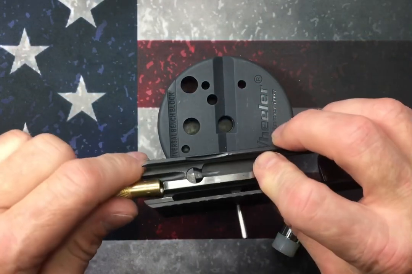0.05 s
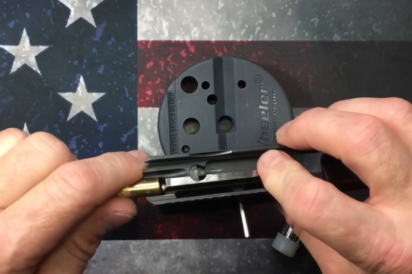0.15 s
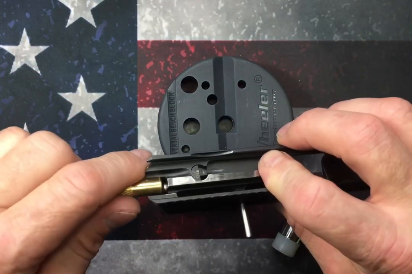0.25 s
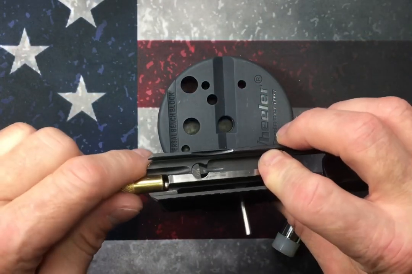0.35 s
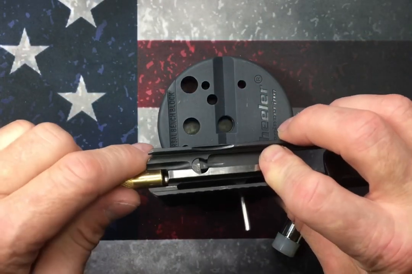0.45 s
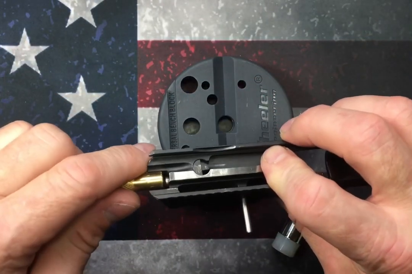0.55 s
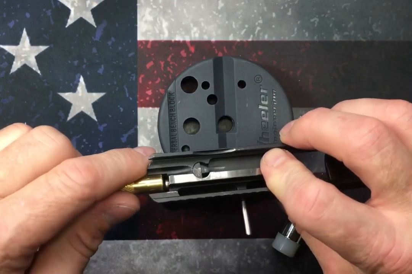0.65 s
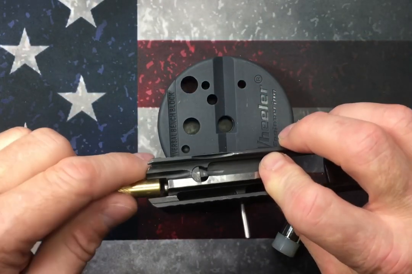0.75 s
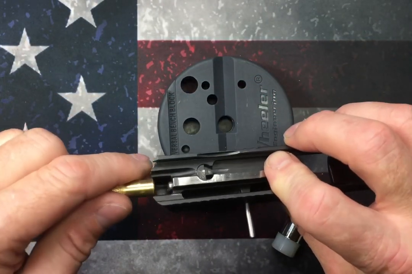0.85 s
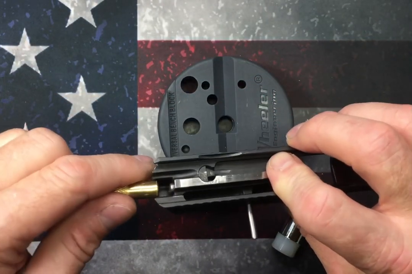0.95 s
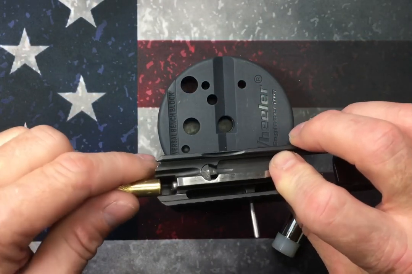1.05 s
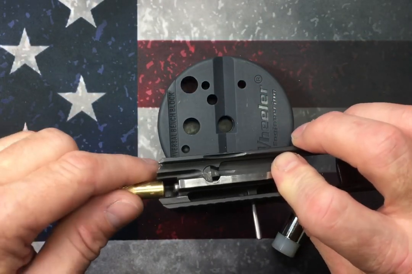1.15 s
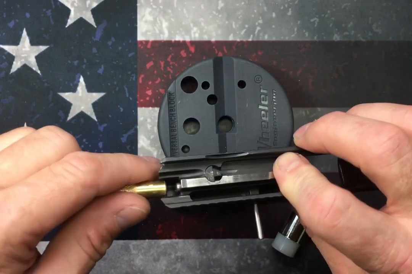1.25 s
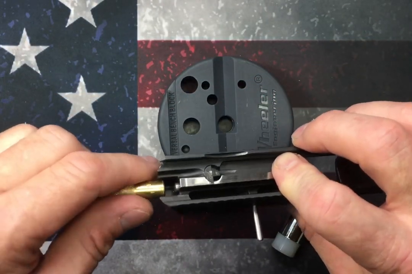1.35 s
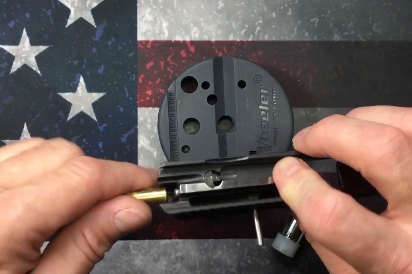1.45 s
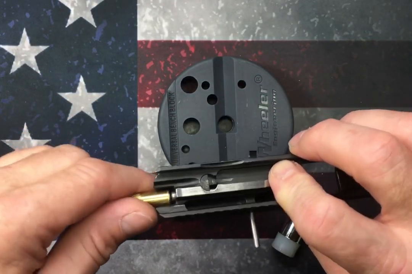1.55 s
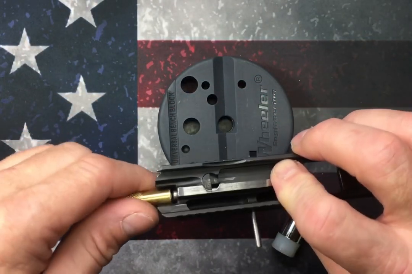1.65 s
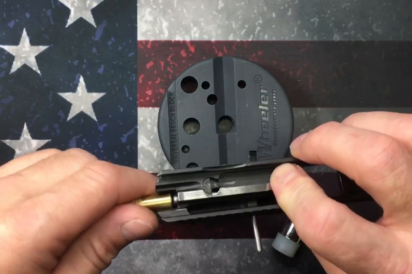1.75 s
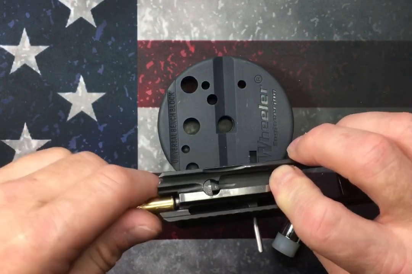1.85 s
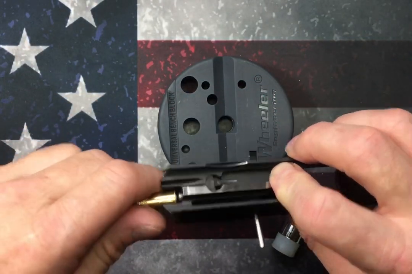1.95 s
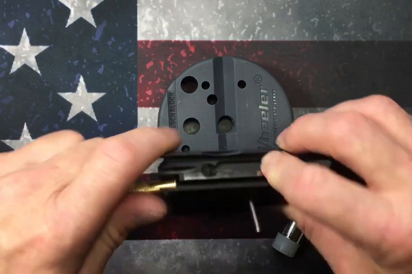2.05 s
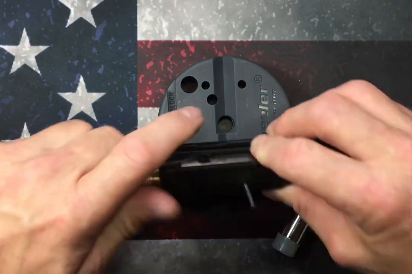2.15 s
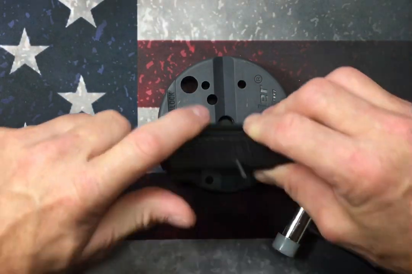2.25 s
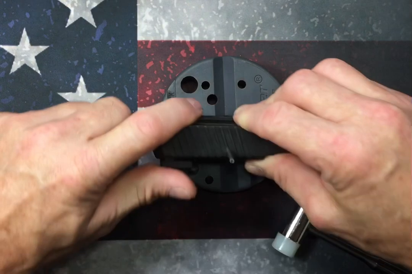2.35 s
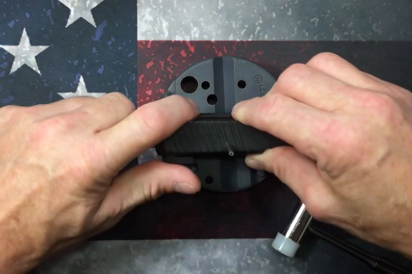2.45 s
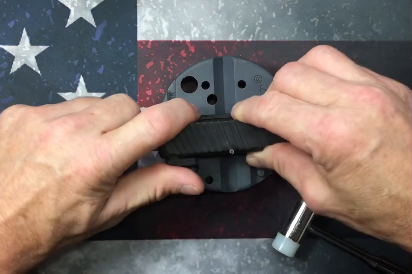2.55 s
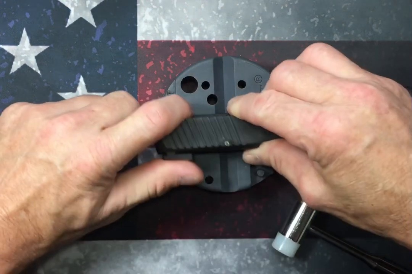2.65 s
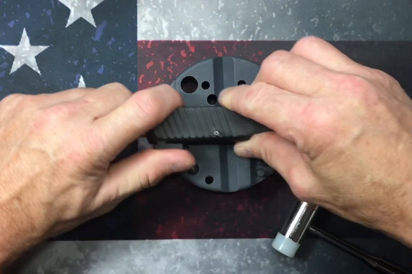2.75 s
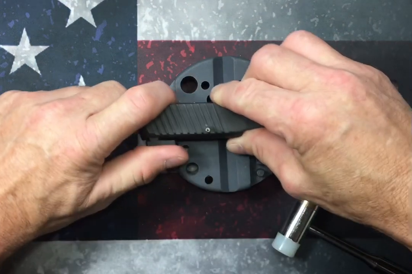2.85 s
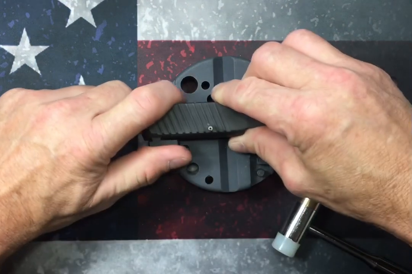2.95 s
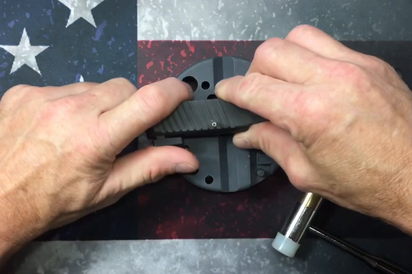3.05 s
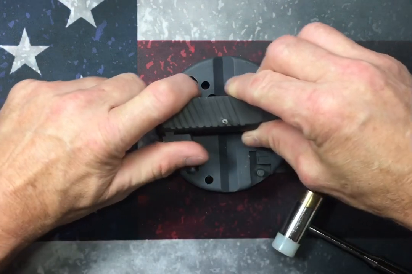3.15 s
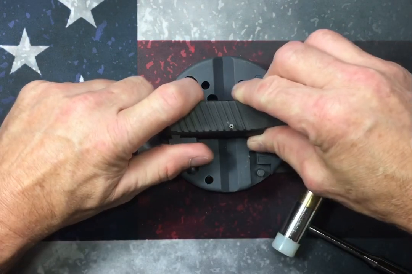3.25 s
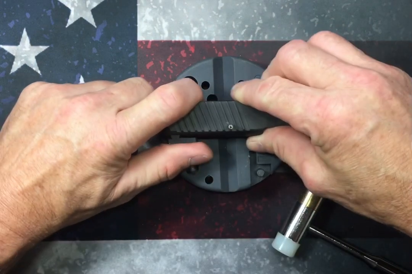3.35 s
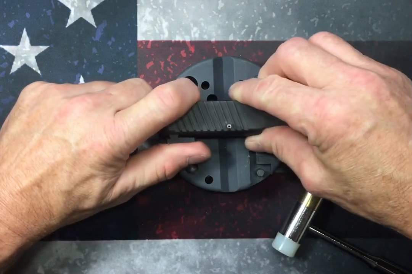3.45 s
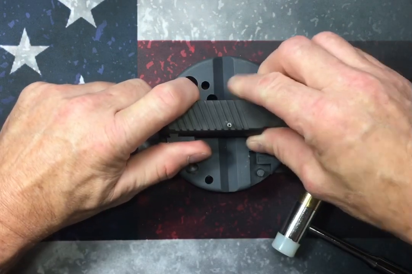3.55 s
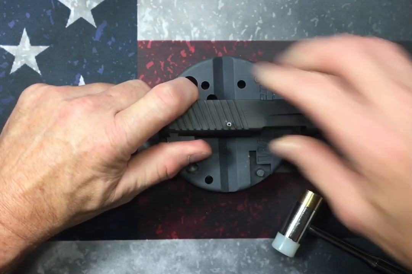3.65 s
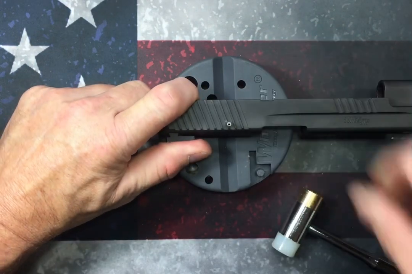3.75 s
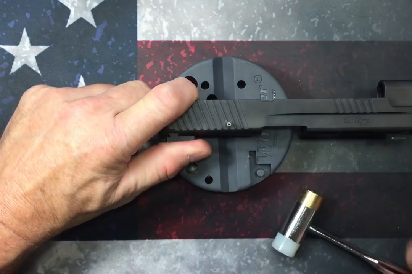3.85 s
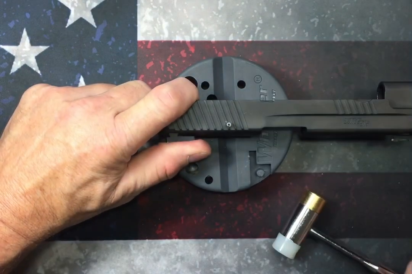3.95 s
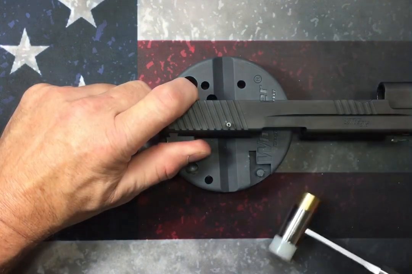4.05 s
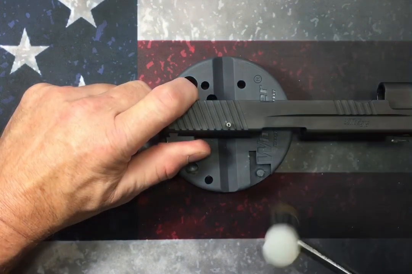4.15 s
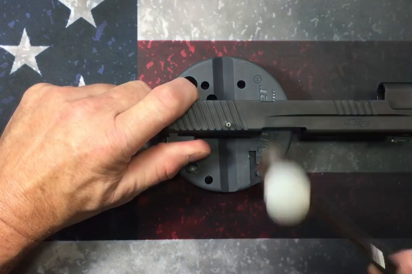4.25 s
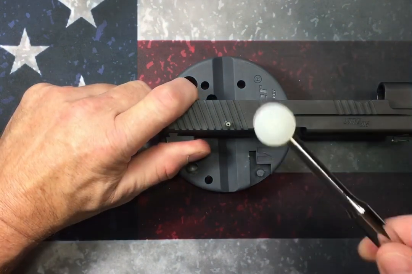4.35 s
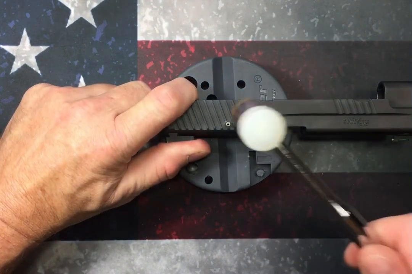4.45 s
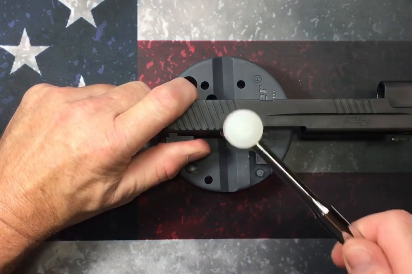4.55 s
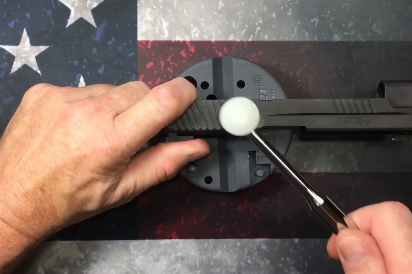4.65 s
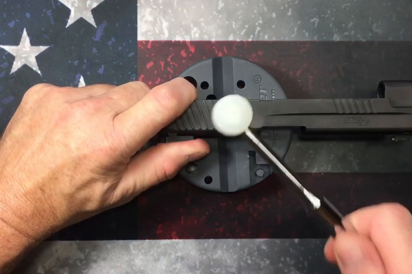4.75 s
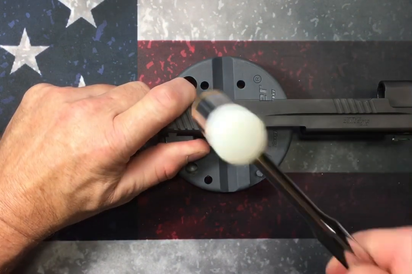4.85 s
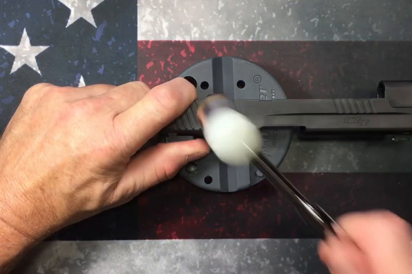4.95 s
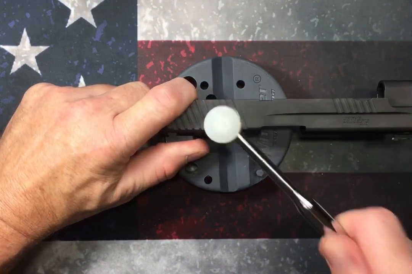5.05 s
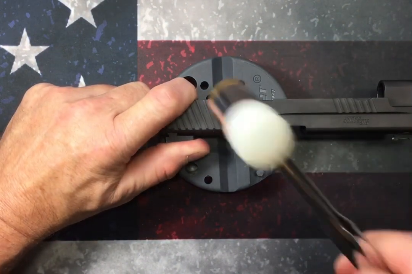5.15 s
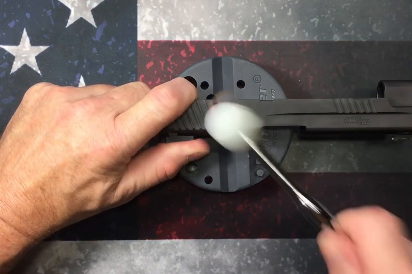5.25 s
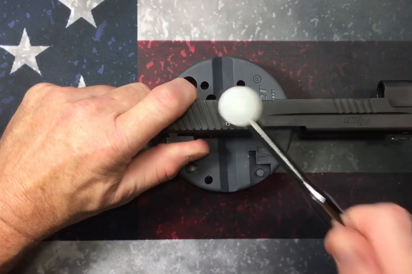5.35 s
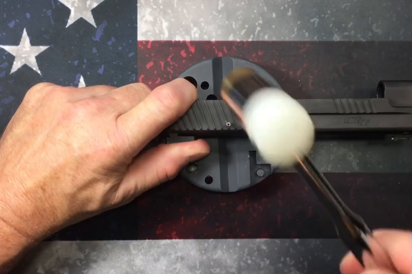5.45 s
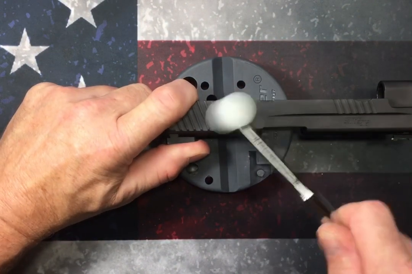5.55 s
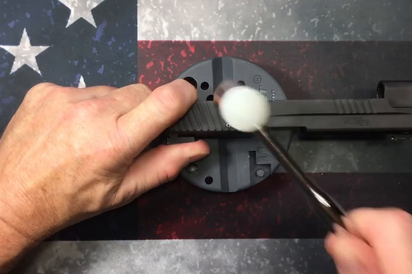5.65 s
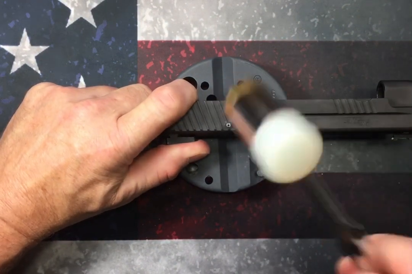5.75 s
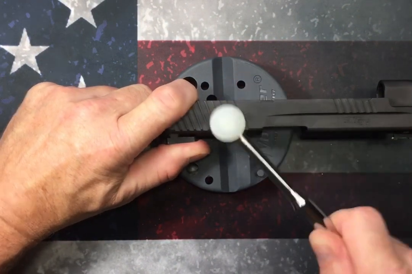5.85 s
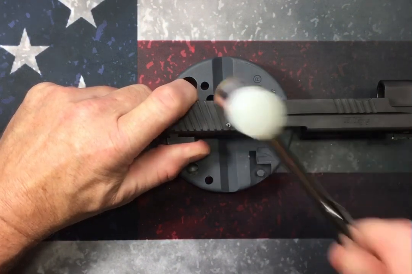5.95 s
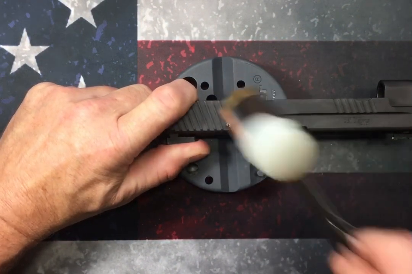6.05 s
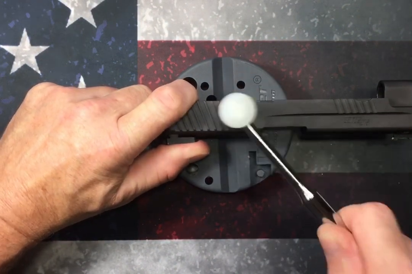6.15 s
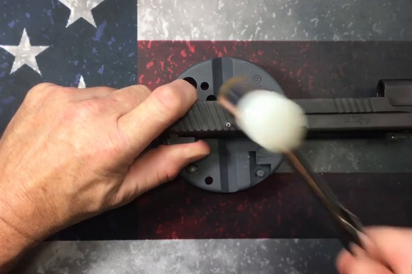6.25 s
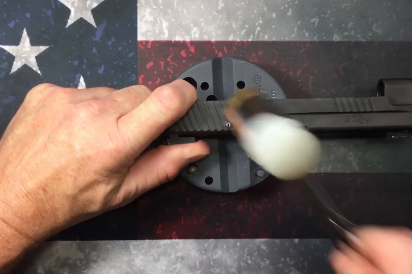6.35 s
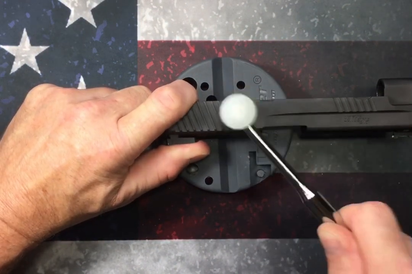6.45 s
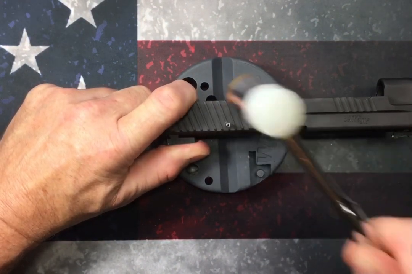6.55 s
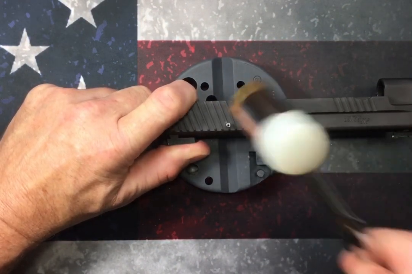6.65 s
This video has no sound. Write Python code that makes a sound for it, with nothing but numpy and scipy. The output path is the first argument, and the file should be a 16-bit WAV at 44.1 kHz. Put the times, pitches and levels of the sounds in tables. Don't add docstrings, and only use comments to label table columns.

```python
import sys
import numpy as np
from scipy import signal
from scipy.fft import rfft, irfft
from scipy.io import wavfile
from scipy.ndimage import uniform_filter1d

SR = 44100
rng = np.random.default_rng(int(sys.argv[2]) if len(sys.argv) > 2 else 0)


def to_wav(s):
    ch = np.atleast_2d(s).T
    pcm = np.round(np.clip(ch, -1, 1) * 32767)
    wavfile.write(sys.argv[1], SR, pcm.astype(np.int16))


def convert_level_to_amplitude(level_db):
    exponent = np.asarray(level_db, float) / 20
    return 10 ** exponent


N = 295029

# (time [s], bench thud [dB], pin ring [dB], head ring over part ring [dB], stand shake [dB])
BLOWS = [
    (5.1132, -11.5, -28, 7.5, -48),
    (5.395, -8.5, -32, 6, -34),
    (5.6718, -5.5, -44, 11, -25),
    (5.9473, -3.5, -39.5, -6.5, -34),
    (6.2258, -5.5, -43, -1, -18),
    (6.5256, -3.5, -33, -7.5, -35),
]
# (frequency [Hz], level [dB], t60 [s])
PIN_MODES = [(2275, -10, .3), (2345, -12, .24), (2450, -12, .24), (3860, -5, .04), (3930, 0, .25),
             (3969, -7, .17), (4010, -9, .03)]
# (frequency [Hz], level [dB], t60 [s])
STEEL_MODES = [(1250, -6, .02), (1820, 0, .025), (2150, -4, .03), (2400, -4, .035), (2800, -1, .025),
               (3300, -5, .02)]
# (frequency [Hz], level [dB], t60 [s])
HEAD_MODES = [(6347, -16, .12), (7930, -16, .06), (10600, -6, .04), (12140, -9, .05), (12380, 1, .03),
              (14300, 0, .02)]
# (frequency [Hz], level [dB], t60 [s])
FREE_RING = [(2400, -41, .18), (3957, -35, .2), (7946, -38.5, .19), (12076, -34, .17)]
# (frequency [Hz], level [dB], t60 [s])
BENCH_MODES = [(152.3, -2.5, 0.27), (179, -4.5, 0.17), (248, -6, 0.054), (272, -14.5, 0.12),
               (323.6, 0.5, 0.06), (398, -16, 0.17), (425.6, -8, .06), (594, -7, 0.051),
               (647.5, -11.5, 0.093), (708.4, -0.5, 0.043), (845, -5.5, 0.031)]
# (frequency [Hz], level [dB])
CRACK_COLOUR = [(300, -20), (800, 3.5), (1300, -5), (1900, 2.5), (2800, 2), (3300, -1.5), (4100, 1.5),
                (5200, -11.5), (8000, -8.5), (10000, -11.5), (12200, -6.5), (13200, -2), (14500, -10),
                (16000, -5.5)]
# (delay [s], level [dB])
KNOCKS = [(0.033, -7.5), (0.0355, -17), (0.0588, -11.5), (.072, -23), (.086, -16), (0.0885, -19.5),
          (0.117, -25)]
CRACK_DB, CRACK_FOLLOWS, RING_DB = -6, 0.2, -27
BODY_HZ, BODY_FOLLOWS = 1340, 1
SETTLE_S, SETTLE_DB = .0235, -17

# (time [s], peak [dB], bright share [dB])
TICKS = [(0.0348, -48.5, -4), (0.1209, -31, -4), (0.2346, -30, -16), (0.3205, -54, -30), (0.34, -59, -25),
         (0.868, -57, -18), (0.945, -48.5, -30), (1.5655, -31, -6.5), (1.615, -39.5, -21),
         (1.623, -37, -11.5), (1.6581, -46, -7), (2.16, -34, -1), (2.673, -66, 2), (2.7653, -56, -16)]
# (middle [s], hold [s], low ring [dB], bright ring [dB])
SLIDES = [(0.133, .002, -49, -53), (0.192, .02, -54, -76), (0.216, 0.0075, -43.5, -58.5),
          (0.242, .01, -50, -77), (0.337, .01, -64, -89), (0.955, 0.0036, -62, -83),
          (1.588, .002, -43.5, -53), (1.63, 0.061, -53.5, -66), (2.167, 0.03, -59, -63),
          (2.223, 0.082, -66, -86), (2.687, .004, -58, -73), (2.772, .01, -80, -73)]
SLIDE_RISE_DB_S, SLIDE_FALL_DB_S = 747, 896
# (frequency [Hz], level [dB], t60 [s])
HELD_MID_MODES = [(1650, -3, .03), (1950, -6, .015), (2200, -2, .03), (2400, -2, .03), (2650, -5, .02)]
# (frequency [Hz], level [dB], t60 [s])
HELD_HIGH_MODES = [(3210, -7, .015), (3600, -7, .015), (3860, -4, .022), (4300, -7, .015), (4830, -4, .028),
                   (5080, -8, .02), (6100, -5, .016), (7170, -8, .024), (7370, -10, .025), (7900, -10, .02),
                   (9135, -11, .02)]
# (frequency [Hz], level [dB per Hz])
GRIT_COLOUR = [(900, -70), (1500, -5.5), (3000, 4), (5000, 3.5), (9500, -1.5), (11000, -53), (16000, -7)]
# (time [s], level [dB])
SET_DOWN = [
    (3.386, -32),
]
# (frequency [Hz], level [dB], t60 [s])
BLOCK_MODES = [(131.6, 5, 0.14), (165, -6.5, 0.17), (324, -10.5, 0.061), (437, 0.5, 0.043),
               (529, -5, 0.098), (610, -2.5, 0.044), (970, -10, 0.03), (2220, -4, 0.036),
               (2600, -16, 0.095)]
# (middle [s], hold [s], level [dB], frequency [Hz])
SQUEAKS = [
    (0.96, 0.01, -58, 2300),
    (.93, 0.052, -83, 3200),
    (2.39, .04, -83, 3200),
    (2.678, 0.021, -70, 3880),
    (2.69, 0.022, -84, 830),
]

# (middle [s], hold [s], level [dB])
RUBS = [
    (3.808, 0.067, -63.5),
    (3.874, 0.092, -72.5),
]
# (frequency [Hz], width [Hz], level [dB])
RUB_MODES = [(1260, 60, -2), (1680, 90, -3), (2050, 80, -4), (2480, 120, -10), (2740, 100, -20)]
RUB_RISE_DB_S, RUB_FALL_DB_S = 294, 350
# (middle [s], hold [s], level [dB])
LIFTS = [
    (2.14, .025, -70),
    (3.997, .002, -76),
    (4.044, .002, -71),
    (4.167, 0.078, -78),
    (4.277, .08, -84),
]
LIFT_RISE_DB_S, LIFT_FALL_DB_S = 600, 511
# (time [s], level [dB], t60 [s])
HANDLE_SHIFTS = [
    (3.657, -66, 0.0092),
    (3.688, -63, 0.016),
    (3.965, -61, .015),
    (3.996, -47, 0.057),
    (4.012, -62.5, 0.11),
    (4.153, -61, 0.05),
]
# (frequency [Hz], level [dB per Hz])
HANDLE_COLOUR = [(500, -42), (900, 5), (1300, 7.5), (2200, 1), (3200, -9), (5000, -19), (12000, -39)]
# (time [s], level [dB])
NUDGES = [
    (2.975, -48),
    (3.995, -49),
]
# (frequency [Hz], level [dB], t60 [s])
STAND_MODES = [(44, 0, .07), (58, -3, .07)]

# (frequency [Hz], t60 [s])
ROOM_T60 = [(60, 0.14), (160, 0.72), (420, 0.4), (1100, 0.39), (2900, 0.25), (7700, 0.27), (16000, 0.14)]

# (time [s], speed [cycles per s])
ENGINE_SPEED = [(1.1, 32), (2.35, 34.9), (2.85, 35.6), (3.4, 35.8), (4.6, 35.5), (5.1, 35)]
ENGINE_ORDERS = {2: [(2.0, .8, -55), (2.85, 0.04, -46), (3.9, 0.75, -49)], 3: [(1.6, 0.56, -53.5),
                 (2.3, 0.54, -47), (3.6, 1.9, -52)], 4: [(2.15, .1, -64), (4.3, .9, -63.5)],
                 5: [(1.6, 0.67, -60.5), (2.25, 0.53, -68), (4.2, 0.77, -74)], 8: [(2.85, 0.48, -61),
                 (3.7, 0.76, -66), (4.7, .5, -64.5)], 9: [(2.2, 0.073, -67.5), (4.1, 0.52, -70),
                 (4.85, 0.56, -57)]}
# (order [-], level re order 5 [dB])
WITH_5 = [(6, -7.5), (10, -16.5)]
# (order [-], level re order 8 [dB])
WITH_8 = [(7, -14), (11, -20.5), (12, -14), (14, -23), (16, -17.5)]
SWELL_DB_S, FADE_DB_S, ORDER_REST_DB = 51, 46.5, -86.5
# (time [s], level [dB])
ROAD_LEVEL = [(0, -85), (1.11, -85), (1.28, -74.5), (2.2, -68), (3.5, -68.5), (4.75, -71), (5.05, -78.5)]
# (frequency [Hz], level [dB])
ROAD_COLOUR = [(60, -15), (110, 9), (170, -22.5), (280, -8), (450, -12), (600, -9), (750, -22.5),
               (930, -16), (1200, -28.5), (2500, -50.5)]
# (frequency [Hz], level [dB rms])
HUM = [(59.2, -50), (86.1, -65.5), (172.3, -78)]
# (frequency [Hz], level [dB])
AIR_COLOUR = [(20, -35.5), (45, -13.5), (90, 6.5), (130, -10), (190, -16), (300, -18.5), (600, -29.5),
              (1500, -29.5), (6000, -36.5), (12000, -42), (15000, -41.5), (15900, -54.5), (17000, -59)]
AIR_DB = -64


def rms_one(x):
    return x / np.sqrt(np.mean(x ** 2) + 1e-20)


def filtered(x, order, hz, kind="low"):
    return signal.sosfilt(signal.butter(order, hz, kind, fs=SR, output="sos"), x)


def in_time(rows):
    s, *columns = np.transpose(rows)
    return [np.interp(np.arange(N) / SR, s, c) for c in columns]


def at_hz(points, hz):
    table_hz, value = np.transpose(points)
    return np.interp(np.log(hz), np.log(table_hz), value)


def coloured(spectrum, size):
    hz = np.fft.rfftfreq(size, 1 / SR) + 1
    return rms_one(irfft(rfft(rng.standard_normal(size)) * convert_level_to_amplitude(at_hz(spectrum, hz)), size))


def drift(rate_hz):
    size = int(N / SR * 200) + 400
    r = np.exp(-2 * np.pi * rate_hz / 200)
    slow = signal.lfilter([1], [1, -2 * r, r * r], rng.standard_normal(size))[200:]
    return np.interp(np.arange(N) / SR * 200, np.arange(len(slow)), rms_one(slow - slow.mean()))


def ring(force, hz, t60_s):
    r, w = convert_level_to_amplitude(-60 / (t60_s * SR)), 2 * np.pi * hz / SR
    return signal.lfilter([0, np.sin(w)], [1, -2 * r * np.cos(w), r * r], force + 1e-18)


def clicks(times_s, sizes):
    out = np.zeros(N)
    at = (np.asarray(times_s) * SR).astype(int)
    np.add.at(out, np.clip(at, 0, N - 1), sizes)
    return out


def bursts(times_s, level_db, t60_s):
    r = convert_level_to_amplitude(-60 / (t60_s * SR))
    return signal.lfilter([1], [1, -r], clicks(times_s, convert_level_to_amplitude(level_db)))


def strokes(middle_s, hold_s, level_db, rise_db_s, fall_db_s):
    late = np.arange(0, N + 32, 32)[:, None] / SR - np.asarray(middle_s)
    half = np.abs(hold_s) / 2
    rise_db = rise_db_s * np.maximum(-late - half, 0)
    fall_db = fall_db_s * np.maximum(late - half, 0)
    db = (level_db - rise_db - fall_db).max(axis=1)
    return np.interp(np.arange(N) / 32, np.arange(len(db)), np.maximum(db, -130))


def struck(modes, times_s, level_db, spread_db, slide=0):
    luck = rng.standard_normal((len(times_s), len(modes), 2))
    out, rub = np.zeros(N), slide * rng.standard_normal(N)
    for k, (hz, db, t60_s) in enumerate(modes):
        moment_s = times_s + 0.00076 * np.abs(luck[:, k, 1])
        force = clicks(moment_s, convert_level_to_amplitude(level_db + spread_db * luck[:, k, 0]))
        out += convert_level_to_amplitude(db) * ring(force + rub, hz, t60_s)
    return out


def thump(modes, times_s, level_db, spread_db, soft):
    luck = rng.standard_normal((len(times_s), len(modes)))
    out = np.zeros(N)
    for k, (hz, db, t60_s) in enumerate(modes):
        out += ring(clicks(times_s, convert_level_to_amplitude(level_db + db + spread_db * luck[:, k])), hz, t60_s)
    return signal.lfilter([1 - soft], [1, -soft], out)


def hammer():
    s, thud_db, pin_db, head_share_db, _ = np.transpose(BLOWS)

    noise = coloured(CRACK_COLOUR, N)
    body = signal.sosfiltfilt(signal.butter(2, BODY_HZ, fs=SR, output="sos"), noise)
    crack = np.zeros(N)
    for db, part in [(CRACK_DB + CRACK_FOLLOWS * thud_db, noise - body),
                     (BODY_FOLLOWS * thud_db + 3.5, body)]:
        crack += (bursts(s, db, 0.012) + bursts(s, db - 12, 0.089)) * part

    pin = struck(PIN_MODES, s, pin_db, spread_db=1.5)
    steel = struck(STEEL_MODES, s, RING_DB - head_share_db / 2, spread_db=8.0)
    head = struck(HEAD_MODES, s, RING_DB + head_share_db / 2, spread_db=3.5)
    free = struck(FREE_RING, s, 0, spread_db=0)

    airborne = np.cumsum(clicks(s, 0.96) - clicks(s + SETTLE_S, 0.96))
    damping = convert_level_to_amplitude(SETTLE_DB * (1 - uniform_filter1d(airborne, size=130)))
    wood = damping * thump(BENCH_MODES, s + 0.002122, thud_db + 0.49, spread_db=2.0, soft=0.92)

    late = sum(clicks(s + delay_s, convert_level_to_amplitude(thud_db + db + 5.0)) for delay_s, db in KNOCKS)
    knocks = signal.lfilter([.08], [1, -.92], ring(late, 235, 0.017))
    return crack + pin + steel + head + free + wood + knocks


def fingers():
    s, peak_db, bright_db = np.transpose(TICKS)
    middle_s, hold_s, low_db, high_db = np.transpose(SLIDES)
    grain_size = convert_level_to_amplitude(1.1 * np.minimum(rng.exponential(1, N), 4))
    grains = (rng.random(N) < 4000 / SR) * grain_size
    dull = convert_level_to_amplitude(strokes(middle_s, hold_s, low_db, SLIDE_RISE_DB_S, SLIDE_FALL_DB_S)) * grains
    sharp = convert_level_to_amplitude(strokes(middle_s, hold_s, high_db, SLIDE_RISE_DB_S, SLIDE_FALL_DB_S)) * grains

    middle = struck(HELD_MID_MODES, s, peak_db - 9, spread_db=0.5, slide=convert_level_to_amplitude(-23.5) * dull)
    bright = struck(HELD_HIGH_MODES, s, peak_db + bright_db - 10.5, spread_db=8.5, slide=convert_level_to_amplitude(-17.5) * sharp)
    grit_level = bursts(s, peak_db + bright_db - 4.5, 0.021) + convert_level_to_amplitude(-9.0) * sharp
    grit = grit_level * coloured(GRIT_COLOUR, N)

    down_s, down_db = np.transpose(SET_DOWN)
    scuff = bursts(down_s, down_db - 22, 0.035) * coloured(HANDLE_COLOUR, N)
    laid = scuff + thump(BLOCK_MODES, down_s, down_db, spread_db=2.5, soft=0.9)
    return filtered(middle + bright + grit, 4, 1450, "high") + filtered(laid, 4, 3200)


def squeaks():
    noise = rng.standard_normal(N)
    out = np.zeros(N)
    for s, hold_s, db, hz in SQUEAKS:
        tone = rms_one(ring(ring(noise, hz, .014), hz, .014))
        out += convert_level_to_amplitude(strokes([s], hold_s, db, 700, 500)) * tone
    return out


def mat():
    noise = rng.standard_normal(N)
    hollow = sum(convert_level_to_amplitude(db) * rms_one(ring(noise, hz, 2.1 / width_hz)) for hz, width_hz, db in RUB_MODES)
    hollow = hollow * convert_level_to_amplitude(2.6 * drift(40))
    grains = (rng.random(N) < 4000 / SR) * rng.standard_normal(N)
    rustle = filtered(grains, 2, 5000, "high")
    rub_db = strokes(*np.transpose(RUBS), RUB_RISE_DB_S, RUB_FALL_DB_S)
    lift_db = strokes(*np.transpose(LIFTS), LIFT_RISE_DB_S, LIFT_FALL_DB_S)
    return convert_level_to_amplitude(rub_db) * rms_one(hollow) + convert_level_to_amplitude(lift_db) * rms_one(rustle)


def handle():
    level = sum(bursts([s], db, t60_s) for s, db, t60_s in HANDLE_SHIFTS)
    return level * coloured(HANDLE_COLOUR, N)


def wrist():
    s, db = np.transpose(NUDGES)
    return thump(BENCH_MODES[:7], s, db, spread_db=5, soft=0.97)


def stand():
    s, *_, shake_db = np.transpose(BLOWS)
    return thump(STAND_MODES, s + .003, shake_db, spread_db=1.5, soft=0.98)


def room(x):
    size = SR // 2
    t, tail = np.arange(size) / SR, np.zeros(size)
    edges_hz = 44 * 2 ** np.arange(0, 9, .5)
    for low, high in zip(edges_hz, edges_hz[1:]):
        band = filtered(rng.standard_normal(size), 2, [low, high], "band")
        tail += band * convert_level_to_amplitude(-60 * t / at_hz(ROOM_T60, np.sqrt(low * high)))
    tail *= 1 - np.exp(-t / 0.00067)
    return signal.fftconvolve(x, tail / np.sqrt(np.sum(tail ** 2)))[:N]


def engine():
    turn = 2 * np.pi * np.cumsum(in_time(ENGINE_SPEED)[0]) / SR
    level_db = {}
    for k, rows in ENGINE_ORDERS.items():
        swell_db = strokes(*np.transpose(rows), SWELL_DB_S, FADE_DB_S)
        level_db[k] = np.maximum(swell_db, ORDER_REST_DB)
    orders = list(level_db.items())
    orders += [(k, level_db[5] + db) for k, db in WITH_5]
    orders += [(k, level_db[8] + db) for k, db in WITH_8]

    tones = np.zeros(N)
    for k, db in orders:
        phase = round(k) * turn + 0.12 * k * drift(3.1)
        tones += convert_level_to_amplitude(db + 0.25 * k * drift(11)) * np.sin(phase)
    near = np.interp(np.arange(N) / SR, [1.12, 1.24, 5.1, 6.4], [0.026, 0.83, 0.82, 0.21])
    road_db = in_time(ROAD_LEVEL)[0] + 4.5 + 1.9 * drift(5.5)
    return np.sqrt(2) * near * tones + convert_level_to_amplitude(road_db) * coloured(ROAD_COLOUR, N)


def workshop():
    t, hum = np.arange(N) / SR, np.zeros(N)
    for hz, db in HUM:
        hum += convert_level_to_amplitude(db + 0.34 * drift(3.5)) * np.sin(2 * np.pi * hz * t + 0.11 * drift(0.76))
    return np.sqrt(2) * hum + convert_level_to_amplitude(AIR_DB) * coloured(AIR_COLOUR, N)


def scene():
    sources = hammer() + fingers() + squeaks() + mat() + handle() + wrist()
    near = filtered(sources, 2, 110, "high")
    reflected = convert_level_to_amplitude(-15.5) * room(filtered(near, 1, 260, "high"))
    return (near + reflected + stand() + engine() + workshop())[None]


def top_cut(x):
    return signal.sosfilt(signal.butter(12, 17100, fs=SR, output="sos"), x)


def record(dry):
    rounded = 0.62 * np.tanh(dry / 0.58)
    ghost = convert_level_to_amplitude(-44) * np.pad(rounded[:, 1024:], ((0, 0), (0, 1024)), "reflect")
    cut = signal.sosfilt(signal.cheby2(12, 60, 16850, fs=SR, output="sos"), rounded + ghost)
    return top_cut(cut)


dry = scene()
out = record(dry)
to_wav(out)
```